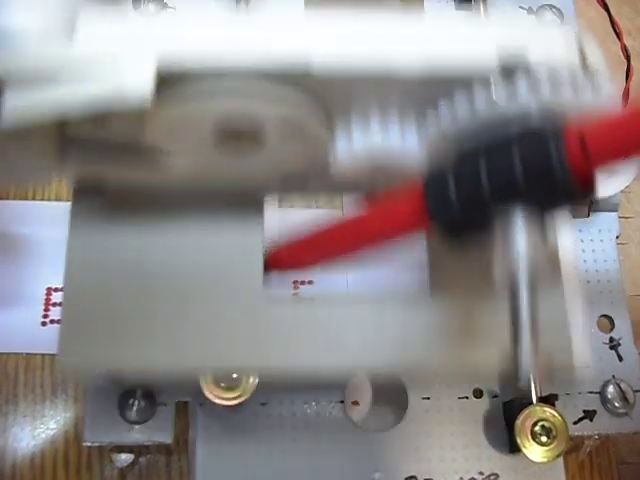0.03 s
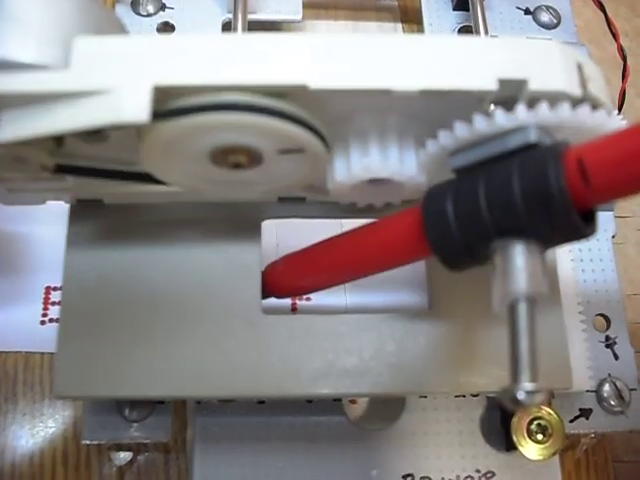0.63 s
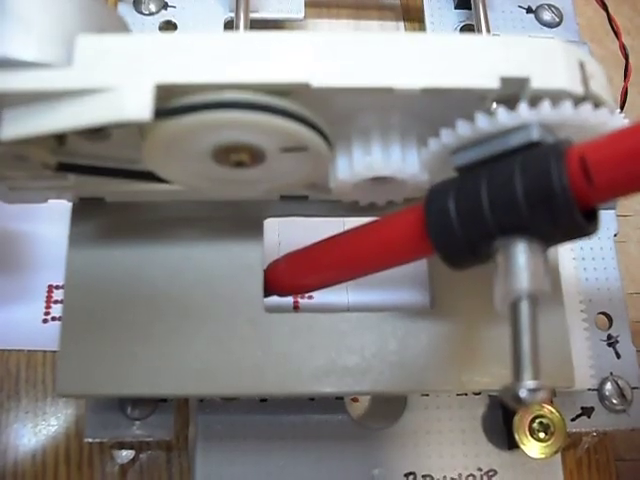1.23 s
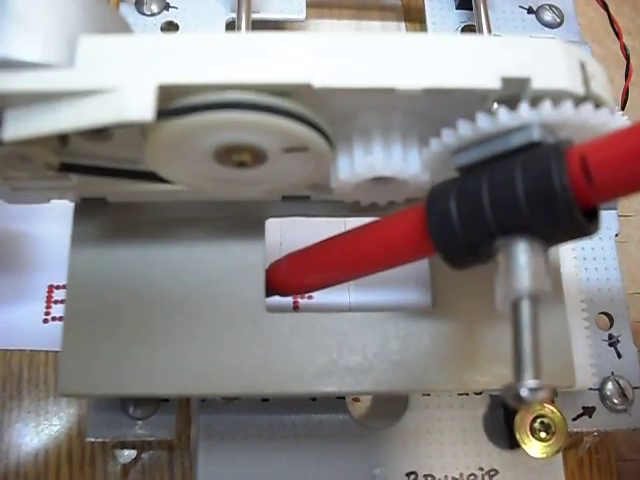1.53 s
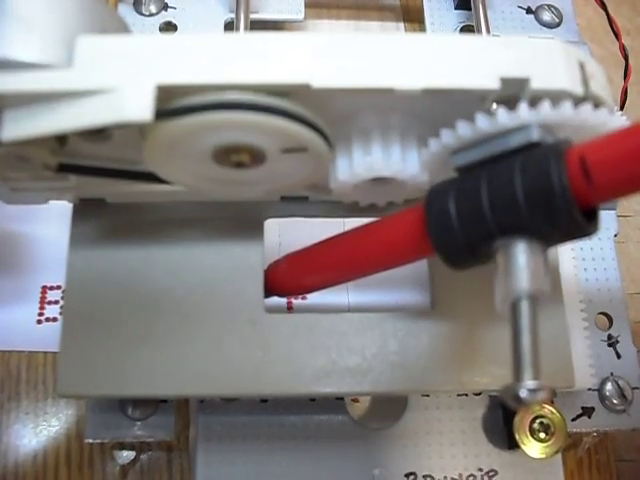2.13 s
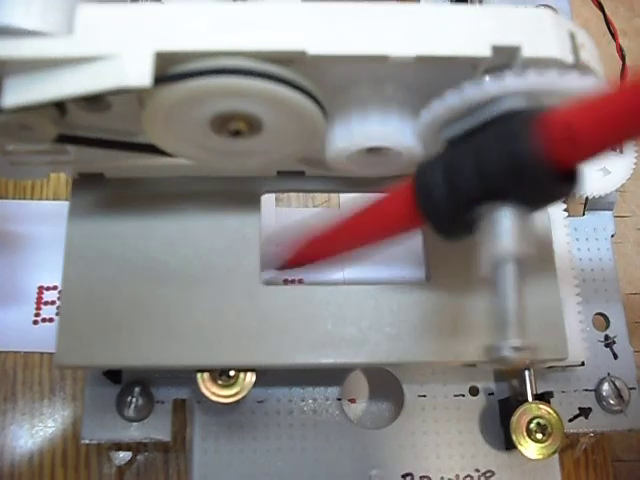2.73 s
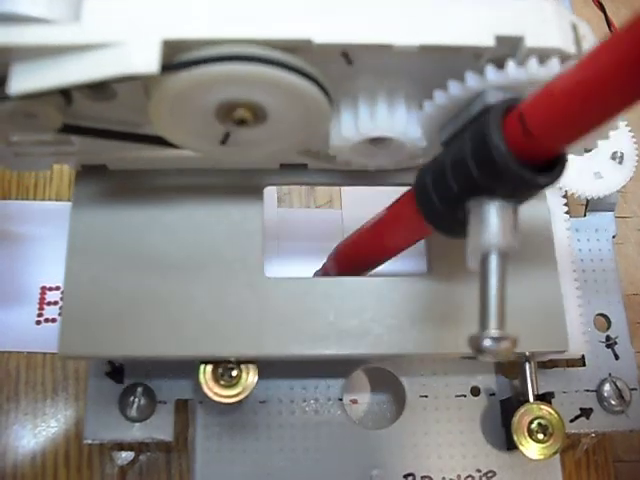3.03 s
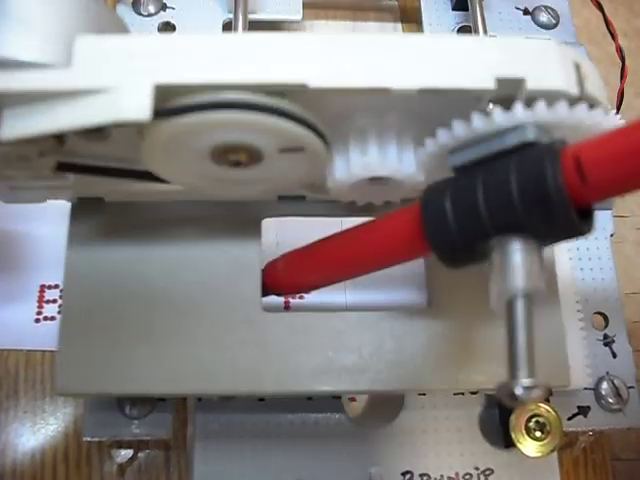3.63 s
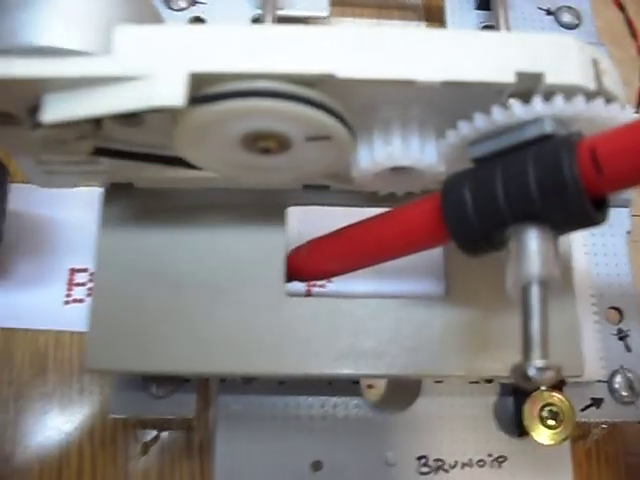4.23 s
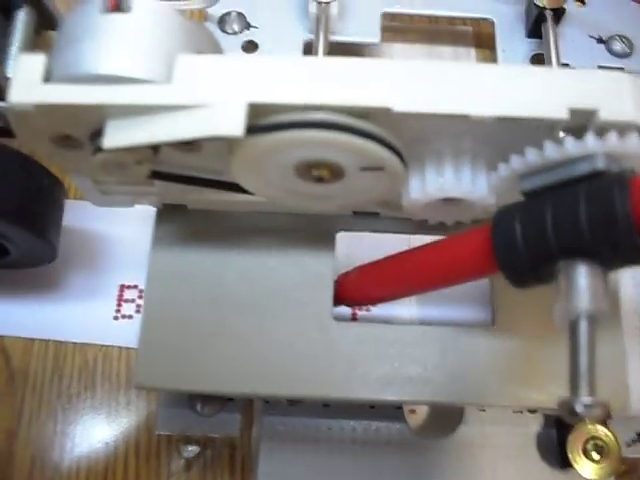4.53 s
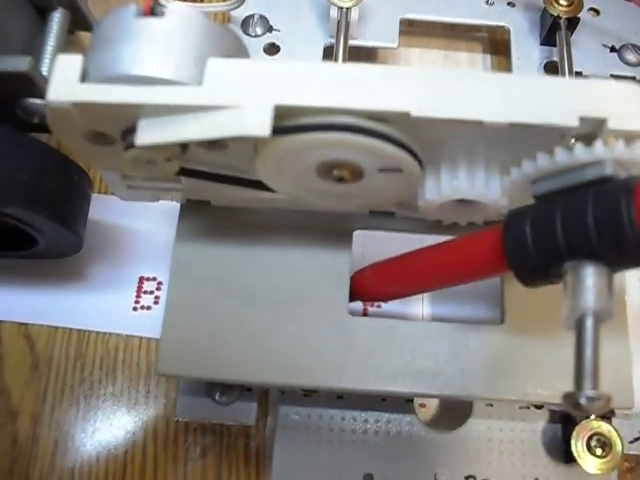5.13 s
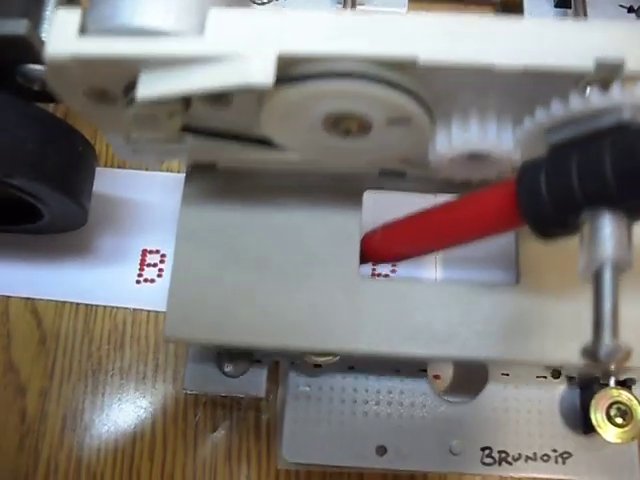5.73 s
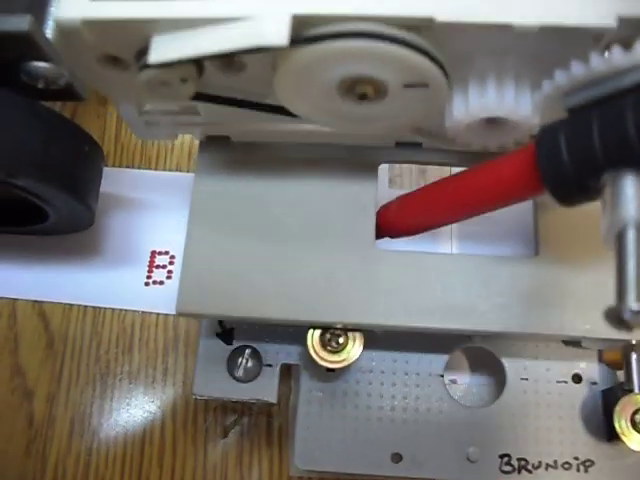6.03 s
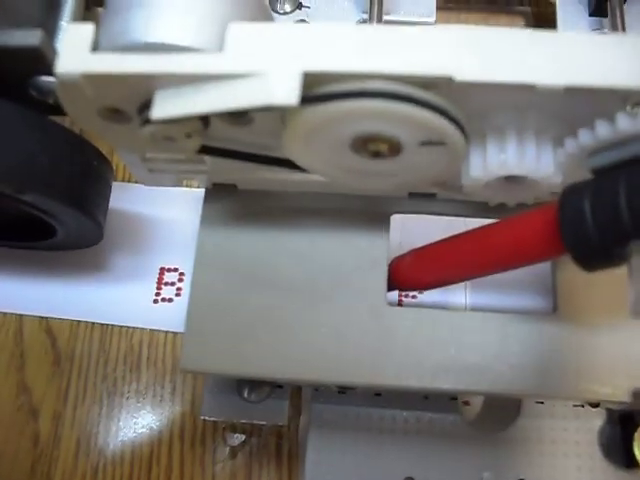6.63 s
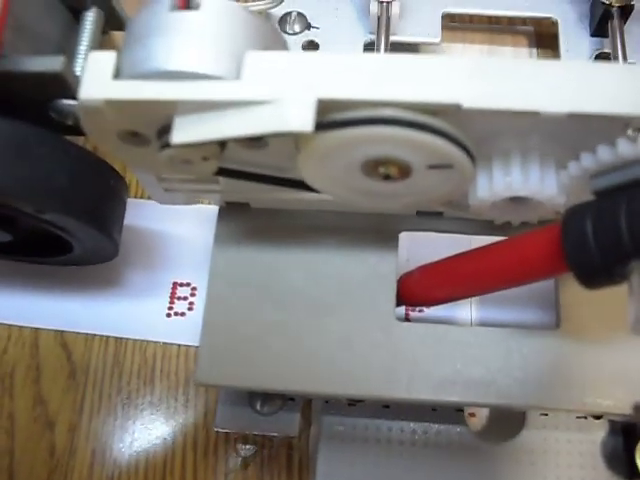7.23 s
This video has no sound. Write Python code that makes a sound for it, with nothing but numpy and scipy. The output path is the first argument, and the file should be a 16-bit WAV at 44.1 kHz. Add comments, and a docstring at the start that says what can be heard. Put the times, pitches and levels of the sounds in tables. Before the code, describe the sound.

Over constant hiss, low rumble and a faint mains hum, the pen carriage of a small printer moves in short bursts of light ticking, heard up close indoors. It hits its stop with a hard clack once at the start and twice midway, where the pen linkage also knocks. Three times it lands with a brief rattle that rocks the base. Dry plastic clicks and soft bumps come before and after the final run.

```python
"""Very close to a small homemade pen printer, over steady hiss, deep rumble and faint mains hum.
The carriage ticks along in quick steps, the pen linkage knocks, the carriage clacks against its stop,
then slides back and lands with a rattle. Each contact is a snap plus chatter ringing a resonant body;
the moves rock the base. Between and after the runs: loose plastic clicks and soft bumps.
A faint rustle surrounds the last run."""
import sys
import numpy as np
from scipy import signal
from scipy.fft import rfft, irfft, next_fast_len
from scipy.io import wavfile
from scipy.ndimage import uniform_filter1d, map_coordinates

SR = 44100
rng = np.random.default_rng(int(sys.argv[2]) if len(sys.argv) > 2 else 0)


def transcribe(signal):
    """Save signal, clipped to [-1, 1], as a 16-bit WAV file at the path in sys.argv[1]."""
    frames = np.atleast_2d(signal).T
    limited = np.clip(frames, -1, 1)
    pcm = np.round(limited * 32767).astype(np.int16)
    wavfile.write(sys.argv[1], SR, pcm)


N = 330309
BLOW_T_S = np.arange(8192) / SR  # time axis of one blow

# carriage hits its stop: (time [s], level [dB])
STOP_HITS = [(0.0208, -19), (2.9847, -19), (3.4257, -19)]
# carriage resonances and dips: (frequency [Hz], width [Hz], lift [dB])
CARRIAGE_MODES = [(267.5, 13, 7), (490, 67, 3.5), (807, 136, 9.5), (1115, 150, 8.5), (1582, 53, 8),
                  (1850, 110, -6), (2107, 170, 5.5), (2610, 430, 4), (3030, 230, 5), (3654, 380, 13),
                  (4230, 200, -5), (4890, 220, 6.5), (5436, 140, 5.5), (5970, 120, -1), (6940, 360, 4.5),
                  (8800, 490, 3)]
# linkage contact spectrum: (frequency [Hz], level [dB])
LINKAGE_TONE = [(100, 13.5), (300, 8.5), (600, -6.5), (1300, -6), (2400, 0.5), (3500, -3.5), (4400, -5.5),
                (6500, -11.5), (8500, -9.5), (10000, -13.5)]


def amp(db):
    """Decibels to gain."""
    return 10 ** (np.asarray(db) / 20)


def along(points, hz):
    """Interpolate (Hz, value) points on a log frequency axis."""
    f, v = np.transpose(points)
    return np.interp(np.log(hz + 1), np.log(f + 1), v)


def add(track, at_s, sound):
    """Mix a sound into a track at at_s."""
    start = round(at_s * SR)
    sound = sound[max(-start, 0):]
    part = track[max(start, 0):][:len(sound)]
    part += sound[:len(part)]


def wobble(rate_hz):
    """Smooth random curve with knots at rate_hz."""
    knots = rng.standard_normal(int(N * rate_hz / SR) + 4)
    return map_coordinates(knots, [np.arange(N) * rate_hz / SR])


def filtered(x, response):
    """Zero-phase filter with gain response(Hz)."""
    m = next_fast_len(len(x) + len(BLOW_T_S))
    return irfft(rfft(x, m) * response(np.fft.rfftfreq(m, 1 / SR)), m)[:len(x)]


def noise(spectrum, size):
    """Coloured noise, rms 1."""
    x = filtered(rng.standard_normal(size), lambda hz: amp(along(spectrum, hz)))
    return x / np.sqrt(np.mean(x ** 2) + 1e-20)


def contact(modes, tone, t60_s, treble_db=0, snap=1.0, ring=1, rise_s=0.00034):
    """A snap and dying chatter drive a body; ring scales its mode lifts. Energy: 2 ms at rms 1."""
    n = len(BLOW_T_S)
    hz = np.fft.rfftfreq(n, 1 / SR)
    chatter = rng.standard_normal(n) * amp(-60 * BLOW_T_S / t60_s) * (1 - np.exp(-BLOW_T_S / rise_s))
    chatter[0] = snap * np.linalg.norm(chatter)
    force = rfft(chatter)
    # divided out below, so like blows keep the body's colour
    unevenness = np.sqrt(uniform_filter1d(np.abs(force) ** 2, size=80))
    colour_db = along(tone, hz) + treble_db * along([(1400, 0), (6000, 1)], hz)
    for mode_hz, width_hz, lift_db in modes:
        drive_db = lift_db + rng.normal()  # strike point varies
        colour_db += ring * drive_db / (1 + (2 * (hz - mode_hz) / width_hz) ** 2)
    # minimum phase: no ringing before the strike
    cepstrum = irfft(np.log(amp(colour_db) / unevenness))
    body = np.exp(rfft(2 * cepstrum[:n // 2], n))
    sound = irfft(force * body)
    return sound / np.linalg.norm(sound) * np.sqrt(0.002 * SR)


def thud(hz, t60_s, rise_s):
    """One damped low mode of base or housing, soft onset, peak near 1."""
    onset = 1 - np.exp(-(BLOW_T_S / rise_s) ** 2)
    swing = np.sin(2 * np.pi * hz * BLOW_T_S) * amp(-60 * BLOW_T_S / t60_s) * onset
    return swing * np.linspace(1, 0, len(BLOW_T_S)) / np.abs(swing).max()


def background():
    """Even hiss, slowly drifting rumble, slightly unsteady mains lines."""
    # hiss spectrum: (frequency [Hz], relative density [dB])
    hiss_tone = [(20, -15), (40, 0.5), (56, 3.5), (85, -4), (130, -5), (200, -9.5), (400, -12),
                 (620, -14.5), (1200, -17), (2500, -20), (5000, -22.5), (10000, -25), (13000, -28)]
    # rumble spectrum: (frequency [Hz], relative density [dB])
    rumble_tone = [(12, -30), (21, -5.5), (27, 5.5), (34, -11), (45, -30), (80, -30), (200, -75)]
    # mains lines: (frequency [Hz], level [dB])
    hum_lines = [(100, -75.5), (200, -85.5), (300.3, -64.5), (400.3, -70)]
    t = np.arange(N) / SR
    hiss = amp(-58.5) * noise(hiss_tone, N)
    rumble = amp(-54.5 + 1.2 * wobble(rate_hz=3)) * noise(rumble_tone, N)
    hum = sum(amp(db) * np.sin(2 * np.pi * hz * t + 0.13 * wobble(rate_hz=3)) for hz, db in hum_lines)
    return hiss + rumble + hum


def take_ups():
    """Just before each clack the linkage chatters through its play and jolts the base."""
    # linkage contacts: (lead [s], relative level [dB], treble [dB], t60 [s], ring [ratio])
    play = [(0.0595, -25.5, -2, 0.021, 0.7), (0.0505, -22.5, -2.5, 0.033, 0.4),
            (0.045, -15.5, 0, 0.017, 0.65), (0.0425, -17, -1, 0.02, 0.52)]
    jolt_lead_s = 0.044
    out = np.zeros(N)
    for at_s, db in STOP_HITS:
        for lead_s, contact_db, treble_db, t60_s, ring in play:
            chatter = contact(CARRIAGE_MODES, LINKAGE_TONE, t60_s, treble_db, snap=0.068, ring=ring)
            add(out, at_s - lead_s, amp(db + contact_db) * chatter)
        add(out, at_s - jolt_lead_s, amp(db - 11.5) * thud(hz=93.4, t60_s=0.13, rise_s=0.004))
        add(out, at_s - jolt_lead_s, amp(db - 31) * thud(hz=222, t60_s=0.062, rise_s=0.0045))
    return out


def clacks():
    """The carriage hits its stop, hard and bright, and rebounds once; the housing rings briefly."""
    # contacts, then a faint diffuse tail: (delay [s], relative level [dB], t60 [s], ring [ratio])
    contacts = [(0, -1.5, 0.0052, 0.77), (.001, -2, 0.0056, 0.92), (.0042, -4.5, 0.01, 1.05),
                (.008, -24.5, 0.15, .1)]
    # clack spectrum: (frequency [Hz], level [dB])
    tone = [(25, -22), (150, 3.5), (450, -6.5), (700, -13), (1250, -22.5), (2100, -0.5), (3300, -2.5),
            (4650, -6), (5500, 4.5), (6300, 0), (7500, -4.5), (9000, -10.5), (10300, -10.5)]
    out = np.zeros(N)
    for at_s, db in STOP_HITS:
        for delay_s, contact_db, t60_s, ring in contacts:
            hit = contact(CARRIAGE_MODES, tone, t60_s, snap=0.14, ring=ring)
            add(out, at_s + delay_s + 0.00055, amp(db + contact_db - 5) * hit)
        add(out, at_s + 0.002, amp(db - 26.5) * thud(hz=396, t60_s=0.16, rise_s=0.0028))
    return out


def steps():
    """Each motor step ticks sharply at its start, softly at its end, and sways the base."""
    # step runs: (first step [s], last step [s], tick level [dB], base sway [dB])
    runs = [(0.1415, 0.2105, -44.5, -40), (2.457, 2.7318, -44.5, -42.5), (3.1057, 3.174, -45, -41),
            (3.546, 3.6834, -43.5, -40.5), (5.9315, 6.4122, -44.5, -43.5)]
    # tick spectrum: (frequency [Hz], level [dB])
    tone = [(100, -0.5), (500, 3.5), (1000, -2.5), (2000, 5), (3000, -5), (4400, -3), (4900, -1), (6300, 2),
            (7200, 1), (8000, -5), (10000, -10)]
    period_s, length_s, close_db = 0.0687, 0.0212, -4.3
    scatter_db, scatter_s = 1.3, 0.0006
    out = np.zeros(N)
    for first_s, last_s, tick_db, sway_db in runs:
        count = round((last_s - first_s) / period_s) + 1
        for k, (open_dev, close_dev, length_dev, pitch_dev) in enumerate(rng.standard_normal((count, 4))):
            last = k == count - 1  # a run ends on one weak, dull tick
            at_s = first_s + k * period_s
            end_s = at_s + length_s + scatter_s * length_dev
            tick = contact(CARRIAGE_MODES, tone, t60_s=0.022, treble_db=-8 * last, snap=0.25, ring=1.1)
            add(out, at_s + 0.0003, amp(tick_db - 6 * last + scatter_db * open_dev) * tick)
            if not last:
                tick = contact(CARRIAGE_MODES, tone, t60_s=0.012, treble_db=-1.5, snap=0.084, ring=1.15)
                add(out, end_s, amp(tick_db + close_db + scatter_db * close_dev) * tick)
            sway = thud(hz=78 + 3 * pitch_dev, t60_s=0.21, rise_s=0.003)
            add(out, end_s + 0.006, amp(sway_db - 5 * last) * sway)
    return out


def landings():
    """The carriage hisses along its guide as it speeds up, lands, rattles and rocks the base twice."""
    # carriage landings: (time [s], level [dB])
    arrivals = [(0.2872, -25), (3.761, -26), (6.4894, -26)]
    # contacts per landing: (delay [s], relative level [dB], treble [dB], t60 [s], ring [ratio])
    rattle = [(0, -4, 1, 0.013, .7), (.0055, -12.5, -9, .03, .7), (.0088, -6.5, 14, 0.034, .6),
              (.015, -16.5, 18, .03, .8), (.023, -21.5, 3, .03, 1.2), (.029, -14.5, 6.5, .035, 1.2),
              (.042, -20.5, 15, 0.017, 2.1), (.07, -32.5, -3, 0.02, 1)]
    # sliding spectrum: (frequency [Hz], relative density [dB])
    slide_tone = [(200, 1), (1000, 4.9), (3500, 3), (7000, 4), (10000, 1)]
    # rattle spectrum: (frequency [Hz], level [dB])
    rattle_tone = [(100, -6.5), (400, -3.5), (750, -1.5), (1200, 1.5), (2300, -1.5), (3300, -12.5),
                   (4300, -16), (6000, -13), (8000, -21), (10000, -23)]
    slide_s = 0.075
    speed = np.linspace(0, 1, int(slide_s * SR))
    out = np.zeros(N)
    for at_s, db in arrivals:
        add(out, at_s - slide_s, amp(-53.5) * speed ** 0.5 * noise(slide_tone, len(speed)))
        for delay_s, contact_db, treble_db, t60_s, ring in rattle:
            hit = contact(CARRIAGE_MODES, rattle_tone, t60_s, treble_db, snap=0.55, ring=ring)
            add(out, at_s + delay_s, amp(db + contact_db - 1) * hit)
        add(out, at_s + 0.0026, amp(-33.5) * thud(hz=91, t60_s=0.12, rise_s=0.0073))
        add(out, at_s + 0.0309, amp(-32) * thud(hz=79.5, t60_s=0.095, rise_s=0.01))
    return out


def clicks():
    """Loose plastic clicks, from flat taps to a hollow pock that rings on."""
    # plastic contacts: (time [s], level [dB], treble [dB], t60 [s], ring [ratio])
    taps = [(1.719, -53.5, -6, 0.022, 0.1), (4.7181, -41, -6, 0.015, 0.2),
            (4.727, -37.5, 0.5, 0.0072, 0.24), (4.7593, -45, 3, .03, .5), (4.7654, -38, 2.5, 0.0098, 0.57),
            (4.8054, -23, 2.5, 0.0025, 0.97), (5.0302, -41.5, 11, .022, 0), (6.9886, -40, -9, 0.04, 0.08),
            (7.0194, -41, 0, 0.065, 0.07), (7.4733, -40, 15, 0.07, 0.07)]
    # dull ringing of hollow plastic: (time [s], level [dB], t60 [s])
    after_rings = [(4.768, -43.5, 0.032), (4.809, -39, 0.017)]
    # plastic resonances and dips: (frequency [Hz], width [Hz], lift [dB])
    modes = [(1246, 470, 15.5), (1760, 560, 18.5), (2080, 390, 13.5), (2570, 180, -11), (3400, 540, 10),
             (4100, 110, -12), (4700, 520, 5), (5200, 160, -3), (5660, 340, 8), (6100, 200, -7),
             (6720, 850, 14.5), (8800, 1400, 10)]
    # click spectrum: (frequency [Hz], level [dB])
    tone = [(100, -6), (500, -4), (900, 0.5), (2000, -7.5), (2600, -4.5), (4000, -6), (6000, -14),
            (7500, -12), (9500, -15), (10500, -16)]
    out = np.zeros(N)
    for at_s, db, treble_db, t60_s, ring in taps:
        add(out, at_s, amp(db) * contact(modes, tone, t60_s, treble_db, snap=0.63, ring=ring))
    for at_s, db, t60_s in after_rings:
        add(out, at_s, amp(db) * contact(modes, tone, t60_s, treble_db=-18, snap=0.78, ring=0.9))
    return out


def bumps():
    """Soft bumps swing the low base modes; harder ones favour the upper modes."""
    # bumps on the base: (time [s], level [dB], hardness [dB/octave])
    hits = [(1.72, -57, 7), (5.025, -40.5, 5), (5.201, -50, 0), (6.936, -43.5, -5), (6.989, -34, -3),
            (7.018, -45, 3), (7.474, -38, 2.5)]
    # base modes: (frequency [Hz], relative level [dB], t60 [s])
    modes = [(54.7, 2, 0.1), (93, -5, 0.164), (139.7, -5.5, 0.1), (233, -13, 0.044)]
    out = np.zeros(N)
    for at_s, db, tilt_db_per_oct in hits:
        for hz, mode_db, t60_s in modes:
            tilt_db = tilt_db_per_oct * np.log2(hz / modes[0][0])
            add(out, at_s, amp(db + mode_db + tilt_db) * thud(hz, t60_s, rise_s=0.004))
    return out


def knocks():
    """Single knocks of the pen linkage rock the base to and fro."""
    # linkage knocks: (time [s], level [dB], treble [dB], t60 [s], base rocking [dB])
    hits = [(2.7986, -31.5, 9, 0.011, -34), (3.2381, -35.5, 3, 0.015, -34.5)]
    rock_back_s = 0.03
    out = np.zeros(N)
    for at_s, db, treble_db, t60_s, rock_db in hits:
        knock = contact(CARRIAGE_MODES, LINKAGE_TONE, t60_s, treble_db, snap=0.061, rise_s=0.0006)
        add(out, at_s, amp(db) * knock)
        add(out, at_s + 0.0028, amp(rock_db - 3) * thud(hz=88, t60_s=0.17, rise_s=0.0056))
        add(out, at_s + rock_back_s, amp(rock_db) * thud(hz=88.4, t60_s=0.14, rise_s=0.0062))
    return out


def rustle():
    """Faint, uneven rubbing swells and fades around the last run."""
    # rubbing envelope: (time [s], level [dB])
    swell = [(5.4, -82), (5.75, -69), (6.35, -67), (6.6, -70), (6.9, -87)]
    # rubbing spectrum: (frequency [Hz], relative density [dB])
    tone = [(200, -9), (800, -4), (1500, -1.5), (2300, -5), (4000, -15), (10000, -21)]
    level_db = np.interp(np.arange(N) / SR, *np.transpose(swell))
    return amp(level_db + 2.2 * wobble(rate_hz=30)) * noise(tone, N)


def room(x):
    """Small-room reverberation; treble dies first."""
    # room decay: (frequency [Hz], t60 [s])
    decay = [(200, 0.32), (2000, 0.17), (6000, 0.15), (10000, 0.16)]
    predelay_s = 0.0042
    hz, t, spectra = signal.stft(rng.standard_normal(SR // 2), SR, nperseg=256)
    fade = amp(-60 * t / along(decay, hz)[:, None])
    tail = signal.istft(spectra * fade, SR, nperseg=256)[1]
    tail = np.pad(tail / np.linalg.norm(tail), (round(predelay_s * SR), 0))
    return signal.fftconvolve(x, tail)[:N]


def scene():
    """Mono mix: printer close, loose clicks closer still and nearly dry."""
    printer = steps() + knocks() + take_ups() + clacks() + landings()
    loose = clicks()
    reverb = room(amp(-17.5) * printer + amp(-33) * loose)
    return (printer + loose + bumps() + reverb + background() + rustle())[None]


def record(dry):
    """The microphone rolls off steeply in the top treble."""
    # microphone response: (frequency [Hz], gain [dB])
    response = [(10, 1), (10200, -0.5), (10600, -8), (11000, -17), (11700, -16), (12300, -34)]
    cutoff_hz = 12350
    return filtered(dry[0], lambda hz: amp(along(response, hz)) * (hz < cutoff_hz))[None]


dry = scene()
out = record(dry)
transcribe(out)
```